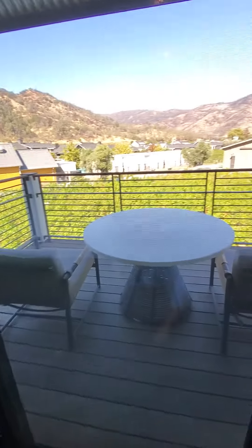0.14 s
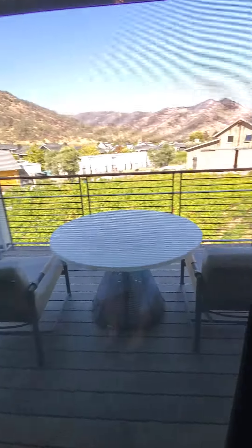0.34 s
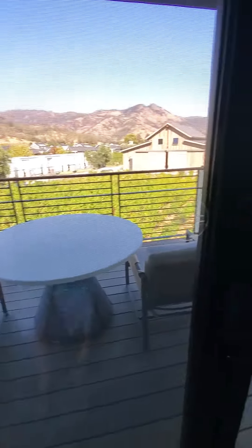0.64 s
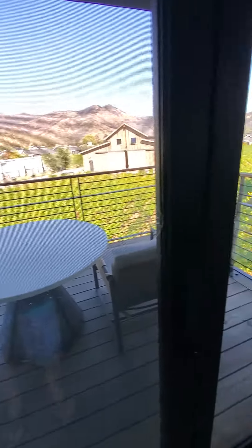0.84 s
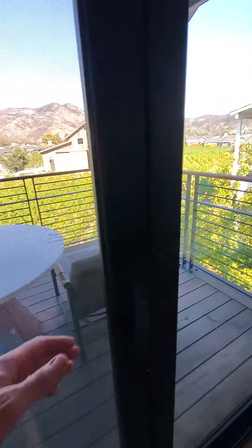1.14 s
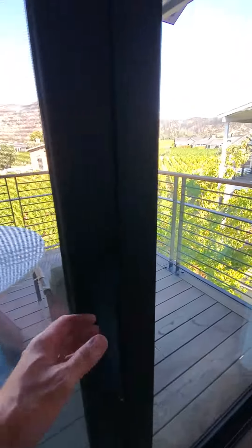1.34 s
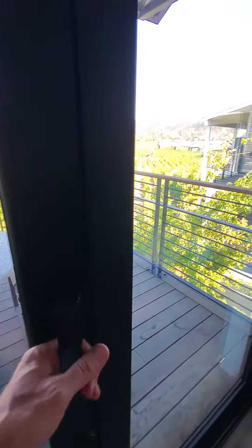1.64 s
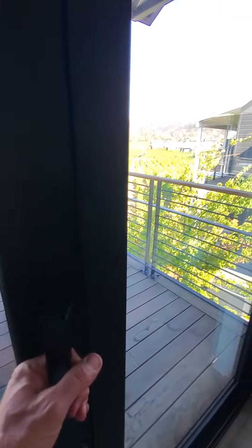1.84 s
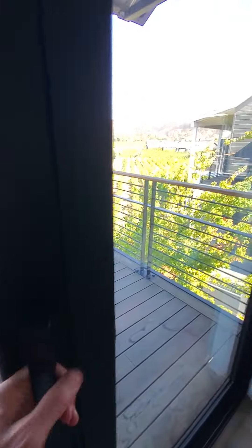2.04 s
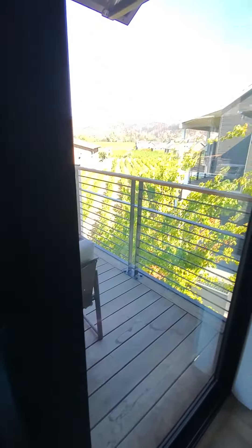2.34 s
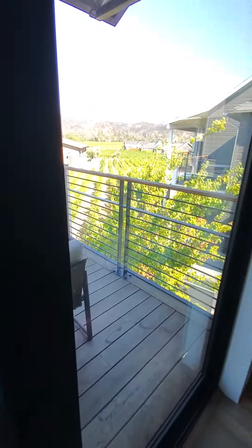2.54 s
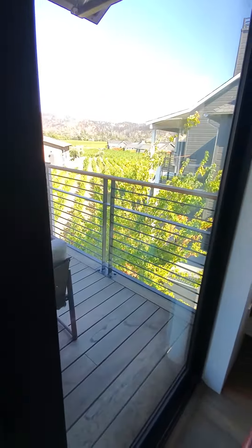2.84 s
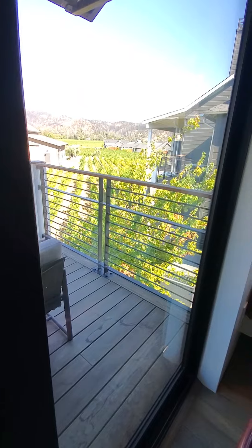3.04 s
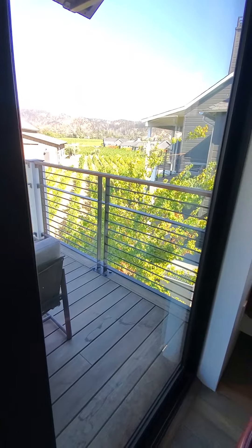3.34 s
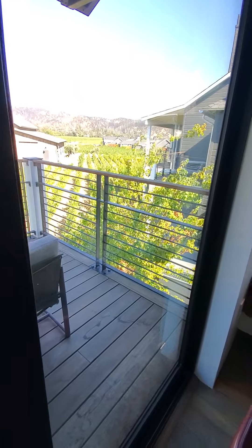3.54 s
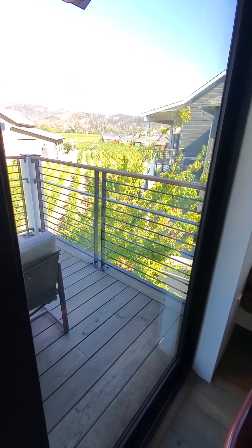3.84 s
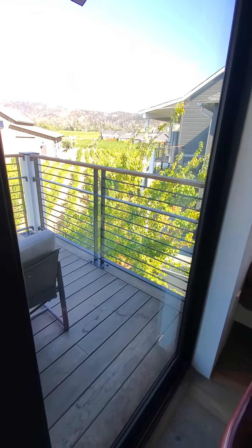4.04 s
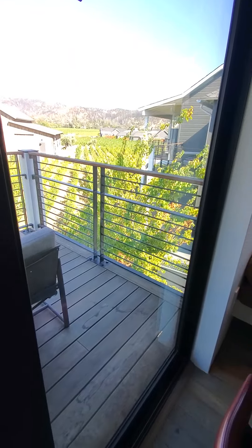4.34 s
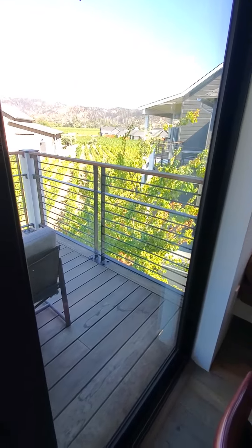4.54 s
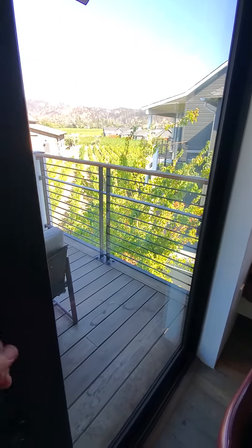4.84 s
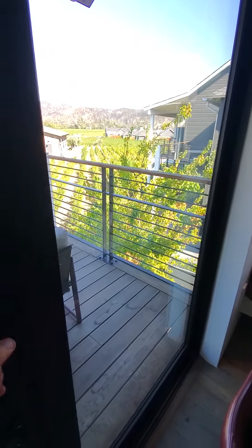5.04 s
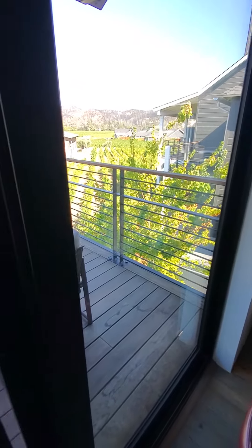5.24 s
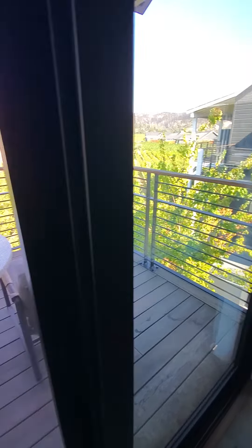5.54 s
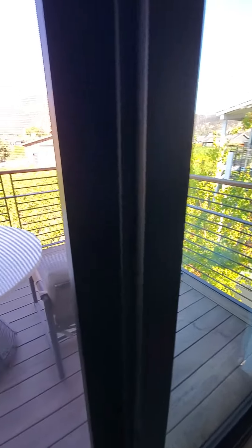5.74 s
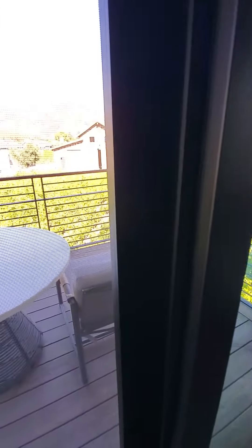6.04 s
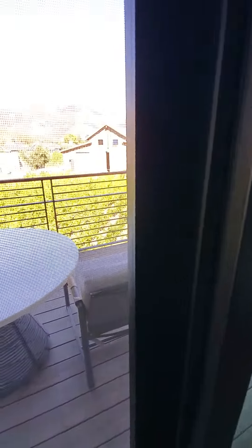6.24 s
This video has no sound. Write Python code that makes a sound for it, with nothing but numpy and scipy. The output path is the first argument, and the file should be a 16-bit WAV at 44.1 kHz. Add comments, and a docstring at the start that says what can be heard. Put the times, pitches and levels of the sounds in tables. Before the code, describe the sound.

Stereo close-up of a large sliding door being opened from inside a small, quiet room. Soft sleeve rustle and dull finger bumps, mainly on the left, surround one strong rattling knock. Bright metallic latch clicks follow, sparse then crowded, with short ringing. Then a push thuds, the frame knocks twice, grit ticks, and wheels roll with a growing grainy rush, airy brush hiss and thin wavering whistle to the end.

```python
"""Glass patio door

A hand takes hold of the door: sleeve noise, pane knocks and frame scuffs, then a clicking, squeaking metal latch.
A panel rolls along its track: wheels rumble and scrape, the brush seal hisses and whistles, grit ticks.
Impacts are noise bursts with ringing modes and a room tail; friction is coloured, uneven noise;
thumps are damped sines. Fingers bump the left microphone; a quiet room hums throughout.
"""
import sys
import numpy as np
from scipy import signal
from scipy.fft import rfft, irfft
from scipy.io import wavfile
from scipy.ndimage import uniform_filter1d

SR = 44100
rng = np.random.default_rng(int(sys.argv[2]) if len(sys.argv) > 2 else 0)


def put_to_file(sound):
    """Save the sound as 16-bit audio at rate SR, in the file named by the first command-line argument."""
    columns = np.atleast_2d(sound).T  # one column per channel
    safe = np.clip(columns, -1, 1)
    whole_steps = np.round(safe * 32767)
    wavfile.write(sys.argv[1], SR, whole_steps.astype(np.int16))


N = 281799
TIME = np.arange(N) / SR  # s

# quiet room, noise colour: f/Hz, relative gain/dB
HUM_COLOUR = [(12, -39.5), (20, -1), (110, 6), (399, -16.5), (485, -13), (624, -23.5), (976, -23),
              (2260, -29), (4540, -26.5), (5080, -32.5), (7520, -42), (10200, -26.5), (16000, -46)]
# decay of the room: f/Hz, t60/s
ROOM_T60 = [(100, 1), (260, 0.41), (700, 0.37), (1840, 0.43), (4850, 0.4), (12800, 0.35)]
# left-right correlation of noise: f/Hz, correlation/1
LIKENESS = [(60, 0.92), (130, 0.9), (300, 0.96), (640, 0.2), (1400, -0.26), (2500, 0.0033), (5000, -0.0073)]
# strokes of hand and sleeve: peak t/s, level before gain/dB, rise per 20 dB/s, fall per 20 dB/s
SLEEVE_STROKES = [(.16, -69, 0.52, .6), (.34, -68.5, 0.19, .15), (.54, -70, 0.094, .3),
                  (.81, -62, 0.33, .24), (1.14, -64.5, 0.097, .15), (1.39, -67.5, .17, .25),
                  (1.785, -49, 0.067, 0.028), (2.12, -66, 0.06, 0.16), (2.2, -63.5, 0.18, 0.094),
                  (2.38, -65, 0.11, .16)]
# sleeve noise colour: f/Hz, relative gain/dB
SLEEVE_COLOUR = [(180, -33.5), (300, -6), (725, -9), (930, -7.5), (1900, -6.5), (2140, -9), (2480, -6),
                 (3760, -10), (9090, -15.5), (16000, -20)]
# knocks on door and frame: t/s, level/dB; relative to it, before offsets: pane boom/dB, rattle/dB, room/dB
KNOCKS = [(0.149, -47.5, -8, -4.5, 5), (1.095, -44, -18, -26, 5.5), (1.799, -26, -1, 4.5, -5),
          (1.811, -17.5, -17, -7.5, -1.5), (2.029, -53, -10, -11, 5), (2.318, -52, 2.5, -14, 2.5),
          (4.705, -40, -7, -34, 0), (5.001, -29, -21, -6.5, -11), (5.026, -47, -26, 2, -11),
          (5.148, -33, -18, -10, -2), (5.167, -23, -15.5, -20, -2)]
# knock noise colours, frame and fittings: f/Hz, relative gain/dB
KNOCK_BODY = [(60, -32), (190, -5), (330, 5.5), (500, -1), (700, -1), (1400, -3.5), (2500, -16.5),
              (8000, -54)]
KNOCK_RATTLE = [(700, -12), (1900, -8.5), (3000, -7), (4200, -13.5), (9000, -22), (16000, -25)]
# ringing modes of the pane: f/Hz, relative level/dB, t60/s
PANE_MODES = [(74.16, -7, 0.87), (101.4, 0.5, 0.47), (173, -14, .9), (253, -17.5, 0.54),
              (306.6, -13.5, 0.48), (346.5, -20, 0.77), (407, -21.5, 0.42), (496, -15, 0.43)]
# hand and door scuffing on the frame: t/s, level/dB, length/s, resonance f/Hz, width/Hz
SCUFFS = [(0.157, -63.5, 0.065, 306, 415), (.503, -67.5, 0.089, 1250, 1010), (1.09, -60.5, .06, 1400, 1400),
          (1.704, -67, 0.079, 2550, 3030), (1.757, -50.5, 0.22, 900, 2040),
          (1.758, -46.5, 0.012, 1970, 1870), (2.317, -64.5, 0.14, 2040, 1520),
          (2.337, -62.5, 0.07, 735, 397), (3.02, -62, 0.088, 2500, 1800), (3.121, -43.5, 0.032, 2340, 900),
          (4.48, -62, 0.028, 13000, 7000), (4.594, -61, 0.088, 188, 200), (4.707, -70, 0.021, 1770, 1100),
          (4.99, -44, 0.14, 1410, 506)]
# finger bumps on the left microphone: t/s, level/dB, f/Hz, decay/s
BUMPS = [(.178, -36.5, 84.5, 0.005), (.915, -45.5, 78, 0.0087), (1.122, -28.5, 120, 0.0037),
         (2.1755, -29.5, 415, 0.00076), (2.1765, -19.5, 114, 0.0028), (2.213, -32, 450, 0.00032)]
# thuds from feet, the push on the panel, a bump in the track: t/s, level/dB, f/Hz, decay/s
THUDS = [(.672, -45, 71, 0.022), (4.704, -43, 189, 0.0023), (4.72, -50, 98.8, 0.07),
         (4.894, -33.5, 97.6, 0.016), (5.892, -23.5, 210, .0016)]
# latch clicks: t/s, level/dB; relative to it, before offsets: body/dB, treble/dB; ping f/Hz
LATCH_CLICKS = [(2.6765, -36.5, -18.5, -16, 2610), (2.7164, -32, -21.5, -3.5, 2180),
                (2.8601, -28, -16, -9, 2620), (3.028, -50.5, -13.5, -34.5, 2730),
                (3.131, -37, -25, -35, 2570), (3.138, -46, -10, -12, 2820),
                (3.1566, -43.5, -9.5, -29, 2100), (3.1723, -21, -16, -10.5, 2370),
                (3.1747, -17.5, -18.5, -14.5, 2790), (3.4066, -40, -22, 7, 11200),
                (3.4442, -36.5, -17, -21, 2400), (3.4589, -36, -8.5, -38, 2250),
                (3.4784, -38, -21, -31, 1354), (3.6739, -39, -16, -36.5, 2180),
                (3.6786, -33.5, -14, -34, 2220), (3.9805, -34, -19.5, -18, 3010),
                (4.1056, -36, -19, -17.5, 2480), (4.1139, -39, -18, -22.5, 2600),
                (4.1246, -34.5, -15, -14, 2170), (4.1598, -30.5, -18, -14, 2150),
                (4.1796, -35.5, -11, -12.5, 1550), (4.1948, -22, -16.5, -9.5, 2290),
                (4.2527, -27, -14.5, -4.5, 2430), (4.266, -25, -16, -4.5, 2260),
                (4.2857, -15.5, -17, -10.5, 2223), (4.4547, -55.5, -22, 8, 10500)]
# ringing modes of the latch housing: f/Hz, relative level/dB, t60/s
LATCH_MODES = [(888, 1, 0.17), (1787, 1.5, 0.15), (2180, 4, 0.16), (2400, -20, .3), (2860, -8, 0.62),
               (3200, -9.5, 0.15), (4800, -12.5, 0.27)]
# click noise colours, clack, ring and sharp edge: f/Hz, relative gain/dB
CLICK_BODY = [(60, -27.5), (170, -1.5), (280, -3.5), (480, -7.5), (650, -6), (1100, 0.5), (1500, -6.5),
              (2400, -13), (6000, -70)]
CLICK_RING = [(500, -60), (1300, -1), (2100, 1), (2850, 4), (3500, -4), (4800, -12), (7000, -34.5),
              (15000, -42.5)]
CLICK_EDGE = [(1500, -22.5), (3600, -6), (5800, -5), (8000, -15), (10800, -14), (14000, -18.5),
              (17000, -34.5)]
# slips of the latch lever: t/s, length/s, starting f/Hz, level before left-right gain/dB
SLIPS = [(4.245, 0.019, 6940, -26.5), (4.261, 0.005, 6290, -27.5)]
# panel noise colours, wheels, scrape before and after it runs free, brush seal: f/Hz, relative gain/dB
RUMBLE = [(20, -9), (48, -25), (75, 4.5), (98, -4), (120, -12), (150, -1), (220, -13.5), (450, -27.5),
          (1500, -55)]
SCRAPE_START = [(100, -17), (300, -3), (700, -1.5), (1250, 6), (1900, -5.5), (3200, -10), (6000, -16),
                (15000, -37)]
SCRAPE_ROLLING = [(100, -9), (290, -1), (480, 3), (650, -3), (950, -3), (1500, -14.5), (2500, -25),
                  (12000, -45)]
SEAL = [(500, -0.5), (1500, 1.5), (2150, 3), (2450, 4.5), (2800, 2.5), (3400, 2), (4200, -0.5), (4850, -1),
        (5700, -4), (8000, -1), (12200, 0), (13500, -1), (16000, -13)]
# panel catching on the track as it starts: peak t/s, level/dB, rise per 20 dB/s, fall per 20 dB/s
CATCHES = [(5.022, -33, 0.058, 0.066), (5.162, -29.5, 0.061, .13)]
# grit under the wheels: t/s, level/dB, treble relative to it before offset/dB, ping f/Hz
GRIT = [(4.9766, -35.5, -13, 1920), (5.0035, -28, -27, 1930), (5.0459, -22, -9, 2753),
        (6.2095, -27, -8.5, 2250)]
# swells of the seal's whistle: peak t/s, level before left-right gain/dB, rise and fall per 20 dB/s, f at peak/Hz
WHISTLES = [(5.42, -53, 0.16, 2450), (5.56, -50, 0.12, 2550), (5.82, -45, 0.31, 2445),
            (5.95, -42, 0.3, 2693), (6.1, -47, 0.27, 2600), (6.26, -47, 0.085, 2700)]

# panel motion: pushed, breaks loose, runs free, at full speed, slows
PUSH_S, LOOSE_S, FREE_S, FULL_SPEED_S, SLOW_S = 4.91, 5.01, 5.22, 5.575, 6.24
PEEL_START_S, PEEL_END_S = 5.08, 5.2  # seal hisses harder as it peels off the frame
SETTLE_S = 5.2  # rumble fades from here: wheels run ever more smoothly
BOUNCE_DB, BOUNCE_SPAN_S, BOUNCE_FADE_DB_PER_S = -11.5, .09, 134
KNOCK_CHATTER_S = 0.0065
SQUEAK_SAG_HZ_PER_S, WHISTLE_RISE_HZ_PER_S = 7100, 430
GRIT_BODY_DB = -21.5  # small stones hardly move the frame
HUM_DB = -66
BAND_LIMIT_HZ = 16400


def amp(db):
    """Amplitude factor of a level in dB."""
    return 10 ** (np.asarray(db) / 20)


def unit(x):
    """Scale to rms 1."""
    return x / np.sqrt(np.mean(x ** 2) + 1e-20)


def read(points, hz):
    """Interpolate a curve over log frequency."""
    f, value = np.transpose(points)
    return np.interp(np.log(hz + 1), np.log(f + 1), value)


def add(mix, start_s, sound):
    """Mix in a sound at start_s, cut at the end."""
    part = mix[:, round(start_s * SR):][:, :sound.shape[-1]]
    part += sound[..., :part.shape[1]]


def noise_pair(size):
    """White noise at two microphones: much shared in the bass, nearly unrelated in the treble."""
    left, other = rfft(rng.standard_normal((2, size)))
    same = np.clip(read(LIKENESS, np.fft.rfftfreq(size, 1 / SR)), -1, 1)
    right = same * left + np.sqrt(1 - same ** 2) * other
    return irfft(np.array([left, right]), size)


def colour(x, points, size=4096):
    """Causal minimum-phase filter with the given spectrum."""
    log_gain = np.log(amp(read(points, abs(np.fft.fftfreq(size, 1 / SR)))))
    taps = np.fft.ifft(np.exp(np.conj(signal.hilbert(log_gain)))).real
    return signal.fftconvolve(x, taps[None], axes=1)[:, :x.shape[1]]


def waver(size):
    """Slow random signal of rms 1, smoothed twice over size samples."""
    once = uniform_filter1d(rng.standard_normal(N), size)
    return unit(uniform_filter1d(once, size))


def uneven_noise(points, grain_db, patch_db):
    """Coloured noise of rms 1 whose level varies from grain to grain and patch to patch."""
    level_db = grain_db * waver(size=60) + patch_db * waver(size=900)
    return unit(colour(noise_pair(N) * amp(level_db), points))


def swell(full_s, release_s, rise_s, fall_s):
    """Attack, hold from full_s to release_s, release; rise_s and fall_s are the times per 20 dB."""
    before = np.maximum(full_s - TIME, 0) / max(rise_s, .001)
    after = np.maximum(TIME - release_s, 0) / max(fall_s, .001)
    return amp(-20 * (before + after))


def strokes(rows):
    """Level of separate strokes that swell and fade; their powers sum."""
    return np.sqrt(sum((amp(db) * swell(s, s, rise_s, fall_s)) ** 2 for s, db, rise_s, fall_s in rows))


def ring(modes, spread_rad):
    """One second of decaying modes; random phases differ between the microphones by spread_rad."""
    t = TIME[:SR]
    phases = spread_rad * rng.standard_normal((len(modes), 2, 1))
    return sum(amp(db - 60 * t / t60_s) * np.sin(2 * np.pi * hz * t + phase)
               for (hz, db, t60_s), phase in zip(modes, phases))


def chatter(points, decay_s, size=4096):
    """Loose parts meet in a dense burst of contacts that swells at once and dies away."""
    decay_s = max(decay_s, .0005)
    u = TIME[:size] / decay_s
    contacts = amp(1.2 * unit(uniform_filter1d(rng.standard_normal(size), size=25)))
    envelope = (0.39 + 2 * u) * np.exp(-2 * u)
    burst = colour(noise_pair(size) * contacts * envelope, points)
    return unit(burst) * np.sqrt(2 * decay_s * SR / size)  # energy follows the decay


def room(x, gap_s=0.0037, size=32768):
    """Diffuse tail of the room, each band dying at its own speed."""
    hz, t, z = signal.stft(noise_pair(size), SR, nperseg=256)
    decay = amp(-60 * t / read(ROOM_T60, hz)[:, None])
    tail = signal.istft(z * decay, SR, nperseg=256)[1][:, :size]
    tail *= np.clip(TIME[:size] / gap_s - .5, 0, 1)  # fades in around gap_s
    return signal.fftconvolve(x, tail / np.linalg.norm(tail[0]), axes=1)[:, :N]


def resonate(x, hz, width_hz):
    """A steep resonance that follows hz: shift down, smooth twice, shift back."""
    turn = np.exp(2j * np.pi * np.cumsum(hz * np.ones(x.shape[1])) / SR)
    r = np.exp(-np.pi * width_hz / SR)
    return (turn * signal.lfilter([1], [1, -2 * r, r * r], x / turn)).real


def hum():
    """Quiet room: steady coloured noise, strongest in the bass, with a slightly uneven level."""
    return amp(HUM_DB) * uneven_noise(HUM_COLOUR, grain_db=1.0, patch_db=2.2)


def sleeve(gain_db=4):
    """Light brushing as the hand reaches out and grips the handle: friction noise in strokes."""
    return amp(gain_db) * strokes(SLEEVE_STROKES) * uneven_noise(SLEEVE_COLOUR, grain_db=1.0, patch_db=0.56)


def knocks(body_db=-10, rattle_db=-8, pane_db=-1, thud_db=-7, thud_hz=170, thud_decay_s=0.002, flutter_db=3.0):
    """The frame thuds, its fittings rattle and the big pane booms unevenly in its gasket."""
    out, pane = np.zeros((2, 2, N))
    for s, db, boom_db, fittings_db, room_db in KNOCKS:
        hit = amp(body_db) * chatter(KNOCK_BODY, KNOCK_CHATTER_S)
        hit += amp(fittings_db + rattle_db) * chatter(KNOCK_RATTLE, KNOCK_CHATTER_S)
        t = TIME[:hit.shape[1]]
        u = t / thud_decay_s
        hit += amp(thud_db) * u * np.exp(1 - u) * np.sin(2 * np.pi * thud_hz * t)
        add(out, s, amp(db) * hit)
        add(out, s, amp(db + room_db) * room(hit))
        add(pane, s, amp(db + boom_db + pane_db) * ring(PANE_MODES, spread_rad=0.15))
    return out + pane * amp(flutter_db * waver(size=500))


def scuffs(grain_db=3.5, room_db=-4):
    """Hand and door rub the frame in short grainy strokes, each around one resonance."""
    out = np.zeros((2, N))
    friction = noise_pair(N) * amp(grain_db * waver(size=50))
    for s, db, length_s, hz, width_hz in SCUFFS:
        stroke = resonate(friction[:, round(s * SR):round((s + length_s) * SR)], hz, width_hz)
        add(out, s, amp(db) * unit(stroke * signal.windows.tukey(stroke.shape[1], .5)))
    return out + amp(room_db) * room(out)


def thumps(rows, right_db):
    """Soft low pushes: damped sines, right channel at right_db relative to left."""
    out, t = np.zeros((2, N)), TIME[:SR // 2]
    for s, db, hz, decay_s in rows:
        envelope = t / decay_s * np.exp(1 - t / decay_s)
        add(out, s, -amp(db) * envelope * np.sin(2 * np.pi * hz * t) * amp([[0], [right_db]]))
    return out


def finger_bumps():
    """Fingers push the left microphone; hardly anything reaches the right."""
    return thumps(BUMPS, right_db=-36)


def thuds():
    """Dull thuds of feet, panel and track, equal at both microphones."""
    return thumps(THUDS, right_db=0.0)


def bounced(hit, count=4):
    """A blow followed by a few small bounces at random moments, weaker the later they fall."""
    out = np.pad(hit, ((0, 0), (0, SR // 5)))
    for chance in rng.random(count):
        s = BOUNCE_SPAN_S * (.15 + .85 * chance)
        add(out, s, amp(BOUNCE_DB - BOUNCE_FADE_DB_PER_S * s) * hit)
    return out


def clicks(rows, ring_db, edge_db, ping_db, modes_db, pane_db, room_db, ping_decay_s, decay_s):
    """Hard parts strike: sharp edge, ping of the part, clack of the body; housing, pane and room ring on."""
    out = np.zeros((2, N))
    phase = np.array([[0], [np.pi / 2]])  # left, right
    for s, db, body_db, treble_db, hz in rows:
        hit = amp(ring_db) * chatter(CLICK_RING, decay_s)
        hit += amp(body_db) * chatter(CLICK_BODY, 2.72 * decay_s)
        hit += amp(treble_db + edge_db) * chatter(CLICK_EDGE, 0.5 * decay_s)
        t = TIME[:hit.shape[1]]
        u = t / ping_decay_s * np.sqrt(hz / 2500)  # higher pings die sooner
        ping = u * np.exp(1 - u) * np.sin(2 * np.pi * hz * t + phase)
        ping *= amp(ping_db + max(treble_db, 0))  # a mostly treble blow pings harder
        add(out, s, amp(db) * bounced(hit + ping))
        add(out, s, amp(db + room_db) * room(hit + .45 * ping))
        add(out, s, amp(db + modes_db) * ring(LATCH_MODES, spread_rad=1.2))
        add(out, s, amp(db + body_db + pane_db) * ring(PANE_MODES, spread_rad=.3))
    return out * amp([[-.9], [.9]])


def latch():
    """The metal latch is worked: clicks with strong pings and small bounces of its loose parts."""
    return clicks(LATCH_CLICKS, ring_db=-7.0, edge_db=-4.5, ping_db=-1.5, modes_db=-24.5, pane_db=-9,
                  room_db=-5, ping_decay_s=0.0021, decay_s=0.0061)


def squeak(octave_db=-13, room_db=-6, jitter=0.017):
    """The lever sticks and slips: each slip is a rough high tone that sags as it lets go."""
    tone, shake = np.zeros((1, N)), 1 + jitter * waver(size=20)
    for s, length_s, hz, db in SLIPS:
        t = np.arange(0, length_s, 1 / SR)
        pitch_hz = (hz - SQUEAK_SAG_HZ_PER_S * t) * shake[round(s * SR):][:len(t)]
        turn = 2 * np.pi * np.cumsum(pitch_hz) / SR
        voice = np.sin(turn) + amp(octave_db) * np.sin(2 * turn)
        add(tone, s, amp(db) * np.sin(np.pi * t / length_s) * voice)
    return tone * amp([[4], [-5]]) + amp(room_db) * room(np.tile(tone, (2, 1)))


def glass_echo(x, gain=0.13):
    """The nearby pane throws one early reflection back to each microphone."""
    delays_s = (.0031, .0043)  # left, right
    echo = [np.pad(side, (round(s * SR), 0))[:N] for side, s in zip(x, delays_s)]
    return x + gain * np.array(echo)


def slide(rumble_db=-42, start_db=-42, rolling_db=-39.5, seal_db=-40.5, peel_db=-44):
    """Wheels rumble and the seal hisses; the harsh scrape of the start deepens once the panel runs free."""
    end_s = N / SR
    start = uneven_noise(SCRAPE_START, grain_db=2, patch_db=1.1)
    start *= np.hypot(amp(start_db) * swell(LOOSE_S, FREE_S, rise_s=0.061, fall_s=0.21), strokes(CATCHES))

    rolling = uneven_noise(SCRAPE_ROLLING, grain_db=2, patch_db=1.1)
    rolling *= amp(rolling_db) * swell(FULL_SPEED_S, SLOW_S, rise_s=0.65, fall_s=0.3)
    rolling *= swell(FREE_S, end_s, rise_s=.15, fall_s=1)

    hiss = uneven_noise(SEAL, grain_db=1.1, patch_db=.6) * amp([[.6], [-.6]])
    steady = amp(seal_db) * swell(LOOSE_S, end_s, rise_s=0.079, fall_s=1)
    peel = amp(peel_db) * swell(PEEL_START_S, PEEL_END_S, rise_s=0.063, fall_s=0.26)
    hiss *= np.hypot(steady, peel)

    rumble = uneven_noise(RUMBLE, grain_db=.8, patch_db=.9)
    rumble *= amp(rumble_db) * swell(PUSH_S, SETTLE_S, rise_s=0.025, fall_s=3.3)
    return rumble + glass_echo(start + rolling + hiss)


def grit():
    """Stones tick under the wheels: clicks with weak body and ping."""
    stones = [(s, db, GRIT_BODY_DB, treble_db, hz) for s, db, treble_db, hz in GRIT]
    return clicks(stones, ring_db=-8.5, edge_db=-2.5, ping_db=-9, modes_db=-42, pane_db=-1,
                  room_db=-2.0, ping_decay_s=0.0042, decay_s=0.0037)


def whistle(width_hz=190, unsteady=0.012):
    """The seal sings faintly in swells of resonant noise; each creeps up in pitch and shakes randomly."""
    friction, shake, out = noise_pair(N), 1 + unsteady * waver(size=300), np.zeros((2, N))
    for s, db, fade_s, hz in WHISTLES:
        pitch_hz = (hz + WHISTLE_RISE_HZ_PER_S * np.clip(TIME - s, -fade_s, fade_s)) * shake
        out += amp(db) * swell(s, s, fade_s, fade_s) * unit(resonate(friction, pitch_hz, width_hz))
    return out * amp([[-1.5], [1.5]])


def scene():
    """Handling, knocks, latch and the rolling panel over the hum of the room."""
    handling = sleeve() + scuffs() + finger_bumps() + thuds()
    panel = slide() + grit() + whistle()
    return hum() + handling + knocks() + latch() + squeak() + panel


def record(dry):
    """Band limit: linear-phase low-pass."""
    taps = signal.firwin(511, BAND_LIMIT_HZ, window=("kaiser", 9), fs=SR)
    return signal.oaconvolve(dry, taps[None], "same")


dry = scene()
out = record(dry)
put_to_file(out)
```